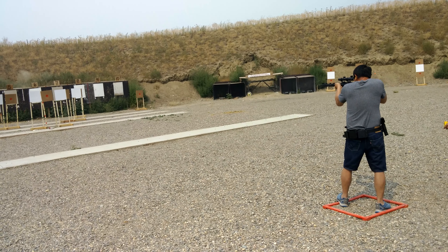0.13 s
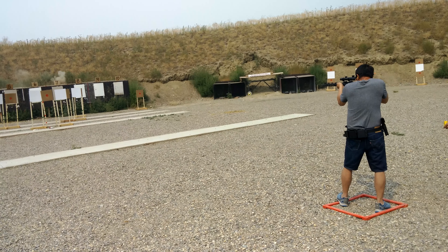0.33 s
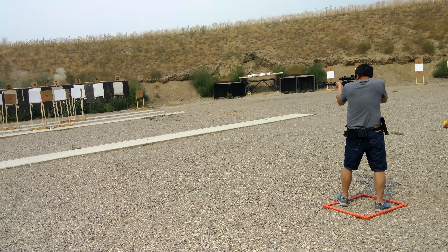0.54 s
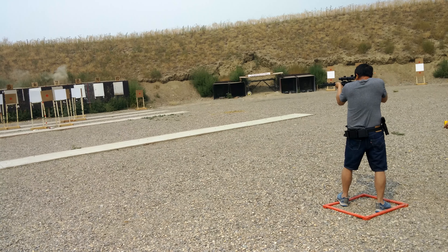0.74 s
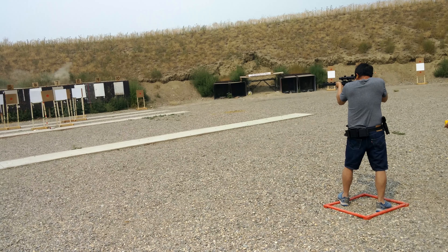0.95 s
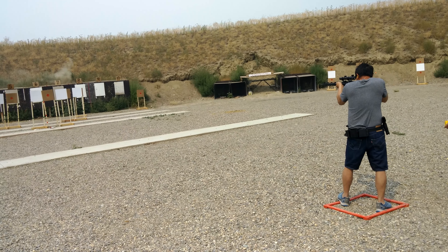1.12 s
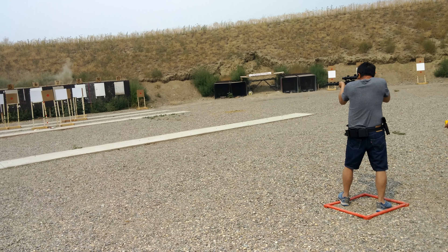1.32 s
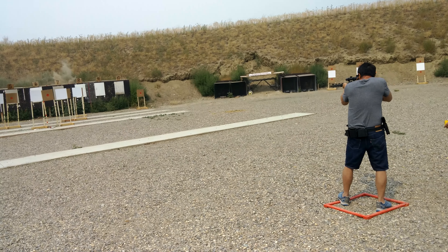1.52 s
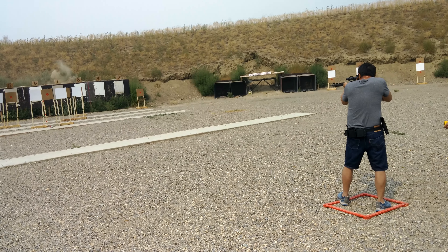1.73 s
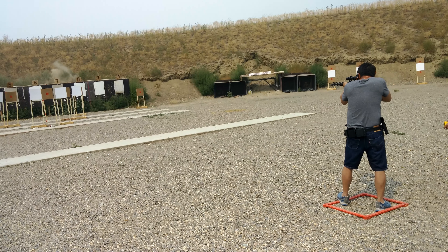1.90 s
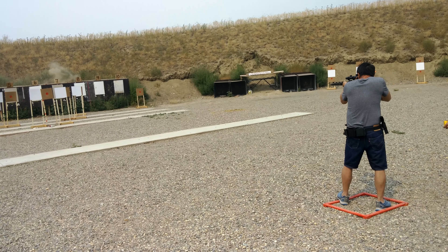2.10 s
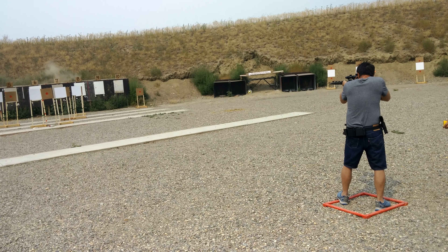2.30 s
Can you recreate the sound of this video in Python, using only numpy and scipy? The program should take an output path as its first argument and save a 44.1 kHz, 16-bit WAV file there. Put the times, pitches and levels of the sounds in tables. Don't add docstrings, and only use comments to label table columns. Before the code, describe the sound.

Rifle fire outdoors: two sharp, overloaded cracks, each rolling off in a short rough echo

```python
import sys
import numpy as np
from scipy import signal
from scipy.fft import rfft, irfft, next_fast_len
from scipy.io import wavfile
from scipy.ndimage import uniform_filter1d, minimum_filter1d, map_coordinates

SR = 44100
rng = np.random.default_rng(int(sys.argv[2]) if len(sys.argv) > 2 else 0)


def inscribe(sig):
    pcm = np.round(np.clip(np.atleast_2d(sig).T, -1, 1) * 32767)
    wavfile.write(sys.argv[1], SR, pcm.astype(np.int16))


def natural_amplitude(level_db):
    exponent = np.asarray(level_db, float) / 20
    return 10 ** exponent


N = 103635

SECOND = np.arange(SR) / SR
SHORT = SECOND[:SR // 20]


def rifle():
    # start_s, blast_db, scatter_db, roll_end_s, hill_db
    shots = [
        (.2380, 19.5, 0.5, .2, 8),
        (1.2994, 27, -3.5, 0.16, -6),
    ]
    out = np.zeros(N)
    for start_s, blast_db, scatter_db, roll_end_s, hill_db in shots:
        add(out, hammer(), start_s - 0.0082)
        add(out, natural_amplitude(blast_db - 13) * blast_wave(SHORT, 0.0004), start_s + 0.0008)
        add(out, scatter(scatter_db), start_s)
        add(out, bank_roll(roll_end_s), start_s)
        add(out, hill(hill_db), start_s)
        add_slaps(out, start_s, scatter_db)
    return out


def blast_wave(t, length_s):
    return (1 - t / length_s) * np.exp(-t / length_s)


def hammer():
    # frequency_hz, density_db
    spectrum = [(1500, -24.5), (3000, 4), (5000, 6), (7000, -35), (12000, -38)]
    level_db, t60_s, rise_s = -32.5, 0.022, 0.00069
    decay = natural_amplitude(level_db - 60 * SHORT / t60_s)
    return decay * (1 - np.exp(-SHORT / rise_s)) * noise(len(SHORT), spectrum)


def scatter(scatter_db):
    # frequency_hz, level_db, t60_s
    spray = [(100, -17, 0.046), (350, -16, 0.062), (750, 0.5, 0.15), (1800, -4, .06), (3920, -1.5, 0.079),
             (8000, -7, 0.093), (14000, -8, 0.057)]
    # frequency_hz, level_db, t60_s
    field = [(49.6, -9, .9), (231.8, -2, .75), (420, -4.5, 0.73), (740, -1, 0.53), (4220, -10.5, 0.54),
             (7000, -5, .5), (10000, -5.5, .36), (15000, -10, .27)]
    spray_db, field_db = 15.5, 11
    grain_db, grain_per_s, blend_s = 4.5, 170, 0.3
    edge_s, edge_db = 0.19, 1.5
    grain = grain_db * wobble(grain_per_s)[:SR] * np.exp(-SECOND / blend_s)
    edge = edge_db * np.clip((SECOND - edge_s) / 0.015, 0, 1)
    rise = np.minimum(SECOND / 0.0008, 1) ** 2
    far = natural_amplitude(field_db + scatter_db) * natural_amplitude(grain + edge) * dying(field)
    return rise * (natural_amplitude(spray_db) * dying(spray) + far)


def bank_roll(end_s):
    # frequency_hz, density_db
    spectrum = [(40, -18), (130, -2), (300, 1), (800, -7), (2000, -18.5), (5000, -22.5), (9000, -40)]
    arrival_s, rise_s, fall_s, level_db = 0.03, 0.031, 0.032, -7.5
    rise = 1 - np.exp(-np.maximum(SECOND - arrival_s, 0) / rise_s)
    fall = np.exp(-np.maximum(SECOND - end_s, 0) / fall_s)
    return natural_amplitude(level_db) * rise * fall * noise(SR, spectrum)


def hill(hill_db):
    # frequency_hz, density_db
    spectrum = [(60, -22.5), (150, -2.5), (300, 7), (800, -19.5), (3000, -20.5), (7000, -25.5),
                (10000, -41)]
    delay_s, width_s, level_db = 0.32, 0.07, -30
    swell = np.exp(-((SECOND - delay_s) / width_s) ** 2)
    return natural_amplitude(level_db + hill_db) * swell * noise(SR, spectrum)


def add_slaps(out, start_s, scatter_db):
    # delay_s, crack_db, thump_db
    slaps = [(.043, -4, 5), (.060, 6, -6), (.081, 3.5, -8.5), (.093, 3.5, -9.5), (0.104, 5, -7.5),
             (.119, 6.5, 6.5), (.137, 4, -6), (.148, -7.5, -2), (.182, -4.5, -6.5), (0.196, -13.5, -6),
             (0.291, -21, -31), (0.619, -70, -42.5)]
    # frequency_hz, gain_db
    colour = [(100, 5.5), (5000, 4.5), (9000, -4.5), (15000, -17)]
    t60_s, rise_s = 0.016, 0.0006
    thump_gain_db, thump_s, thump_lag_s = 10, 0.0013, 0.002
    for delay_s, crack_db, thump_db in slaps:
        envelope = natural_amplitude(-60 * SHORT / t60_s) * (1 - np.exp(-SHORT / rise_s))
        crack = coloured(envelope * rng.standard_normal(len(SHORT)), colour)
        add(out, natural_amplitude(crack_db + scatter_db) * crack, start_s + delay_s)
        thump = (1 - np.exp(-SHORT / 0.00093)) * blast_wave(SHORT, thump_s)
        add(out, natural_amplitude(thump_db + thump_gain_db) * thump, start_s + delay_s + thump_lag_s)


def cases():
    # start_s, level_db, centre_hz
    ticks = [
        (.964, -47, 4000),
        (1.263, -52, 2600),
        (1.92, -56, 1300),
        (2.051, -56, 3600),
    ]
    t60_s, rise_s = 0.014, 0.00033
    out, t = np.zeros(N), np.arange(SR // 40) / SR
    for start_s, level_db, hz in ticks:
        band = [(hz * .25, -25), (hz * .6, 0), (hz * 1.35, 0), (hz * 2, -30), (20000, -60)]
        envelope = natural_amplitude(level_db - 60 * t / t60_s) * (1 - np.exp(-t / rise_s))
        add(out, envelope * noise(len(t), band), start_s - 0.002)
    return out


def wind():
    # start_s, level_db, rustle_db
    gusts = [(0, -30, 0), (.13, -26, 3), (.17, -30, 0), (.23, -28, 0), (.8, -42, -3), (.865, -34, 0),
             (.94, -42, -3), (.99, -34, 3), (1.08, -52, 3), (1.11, -44, 0), (1.2, -52, 3), (1.285, -36, 4),
             (1.8, -48, 0), (2.12, -52, 3), (2.165, -40, 0), (2.2, -44, 0), (2.225, -33, -14),
             (2.35, -34, -14)]
    # frequency_hz, density_db
    low = [(15, -43), (30, -24), (60, -4), (100, -1), (200, -7), (350, -18), (600, -35), (1500, -61)]
    # frequency_hz, density_db
    high = [(200, -20.5), (450, 4), (900, -12.5), (1400, -23), (1900, -45.5), (5000, -90)]
    even_s = 0.052
    lumps_db, lumps_per_s, rustle_gain_db = -1.5, 24, -17
    t = np.arange(N) / SR
    start_s, level_db, rustle_db = np.transpose(gusts)
    buffet = noise(N, low + [(7000, -120)])
    power = np.abs(uniform_filter1d(buffet ** 2, size=round(even_s * SR)))
    buffet = buffet / np.sqrt(power + .01)
    rustle = natural_amplitude(rustle_gain_db) * natural_amplitude(np.interp(t, start_s, rustle_db)) * noise(N, high)
    lumps = natural_amplitude(lumps_db * wobble(lumps_per_s))
    return natural_amplitude(np.interp(t, start_s, level_db)) * lumps * (buffet + rustle)


def hiss():
    # frequency_hz, density_db
    spectrum = [(700, -9), (1300, -10), (2200, -16), (4200, -14), (6500, -21), (16000, -21)]
    return natural_amplitude(-69.5) * noise(N, [(300, -36)] + spectrum)


def unit(x):
    return x / np.sqrt(np.mean(x ** 2) + 1e-20)


def along(hz, points, column=1):
    p = np.array(points, float)
    return np.interp(np.log(hz + 1), np.log(p[:, 0] + 1), p[:, column])


def coloured(x, points):
    m = 2 * next_fast_len(len(x) // 2 + 4096)
    gain_db = along(np.fft.rfftfreq(m, 1 / SR), points)
    cepstrum = irfft(np.log(natural_amplitude(gain_db)), m)
    cepstrum[1:m // 2] *= 2
    cepstrum[m // 2 + 1:] = 0
    return irfft(rfft(x, m) * np.exp(rfft(cepstrum)), m)[:len(x)]


def noise(count, points):
    lead = 2000
    return unit(coloured(rng.standard_normal(count + lead), points)[lead:])


def dying(table):
    lead = 512
    hz, t, z = signal.stft(rng.standard_normal(SR + lead), SR, nperseg=256)
    patches = uniform_filter1d(rng.standard_normal(z.shape), size=9, axis=0)
    patches = unit(uniform_filter1d(patches, size=2, axis=1))
    decay_db = 60 * (t - lead / SR) / along(hz, table, column=2)[:, None]
    gain_db = np.minimum(along(hz, table)[:, None] - decay_db, 20)
    z = z * natural_amplitude(gain_db + 3.5 * patches - 1.4)
    return signal.istft(z, SR, nperseg=256)[1][lead:lead + SR]


def wobble(rate):
    return map_coordinates(rng.standard_normal(400), [np.arange(N) * rate / SR])


def add(track, x, s):
    at = round(s * SR)
    track[at:at + len(x)] += x[:len(track) - at]


def scene():
    # frequency_hz, gain_db
    response = [(30, -10), (120, 1), (1000, -1), (2500, -2), (4200, 2.5), (5500, -8.5), (8000, -31),
                (15000, -31)]
    return (coloured(rifle(), response) + cases() + wind() + hiss())[None]


def limit(x):
    ceiling, look_s = 0.82, 0.0007
    span = 2 * round(look_s * SR / 2) + 1
    need = np.minimum(1, ceiling / (np.abs(x) + 1e-9))
    return x * uniform_filter1d(minimum_filter1d(need, size=span), size=span)


def gate():
    # close_s, open_s
    stretches = [
        (0.883, 1.275),
        (1.861, 2.21),
    ]
    depth_db, ramp_s = -10.5, 0.0045
    t, shut = np.arange(N) / SR, np.zeros(N)
    for close_s, open_s in stretches:
        shut += np.clip((t - close_s) / ramp_s, 0, 1) - np.clip((t - open_s) / ramp_s, 0, 1)
    return natural_amplitude(depth_db * shut)


def roll_off(x):
    return signal.sosfilt(signal.butter(12, 16790, fs=SR, output="sos"), x)


def record(dry):
    # frequency_hz, gain_db
    band_edge = [(15600, 0), (16000, -10), (16700, -16), (16850, -70)]
    # frequency_hz, density_db
    after = [(300, -21.5), (1000, 0), (2000, -5), (4500, -6), (8000, -13), (16000, -12), (16800, -60)]
    overload, hardness = 1.4, 3
    smooth_hz, offset, after_db = 12100, -0.0004, -82
    x = dry[0] / (1 + np.abs(dry[0] / overload) ** hardness) ** (1 / hardness)
    x = limit(coloured(x, [(smooth_hz / 2, 0), (smooth_hz, -3)]))
    m = next_fast_len(N)
    band_gain = natural_amplitude(along(np.fft.rfftfreq(m, 1 / SR), band_edge))
    x = irfft(rfft(x, m) * band_gain, m)[None, :N]
    mix = (x + offset) * gate() + natural_amplitude(after_db) * noise(N, after)
    return roll_off(mix)


dry = scene()
out = record(dry)
inscribe(out)
```